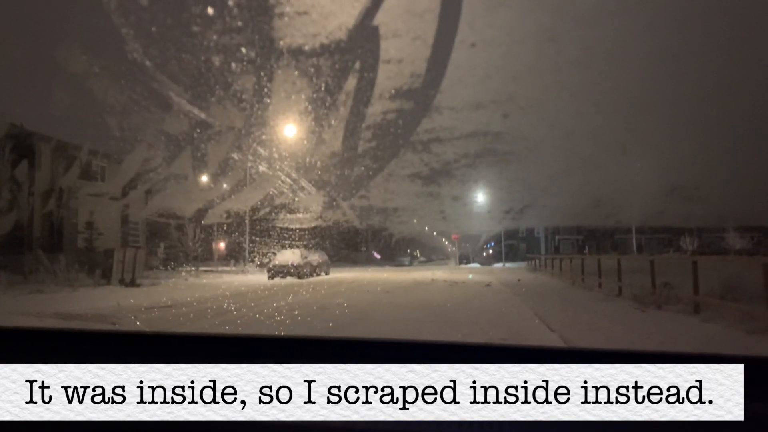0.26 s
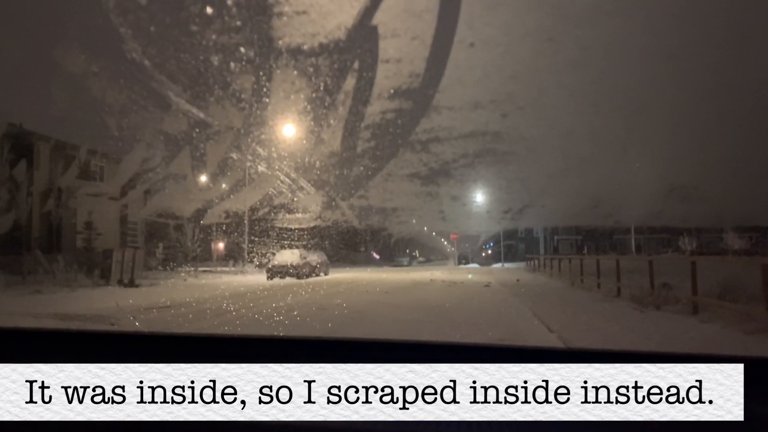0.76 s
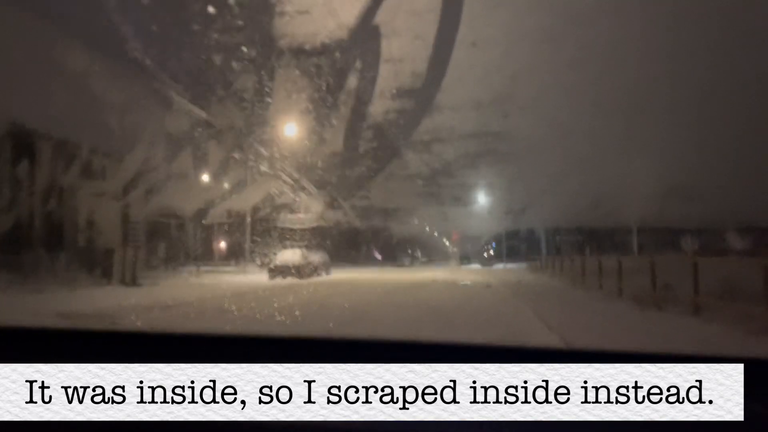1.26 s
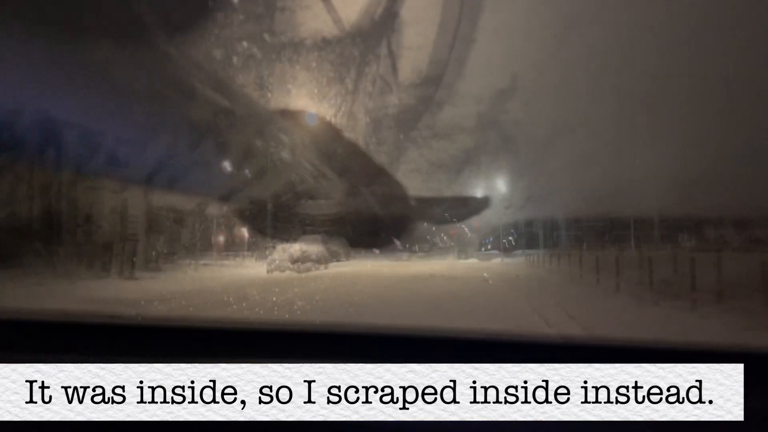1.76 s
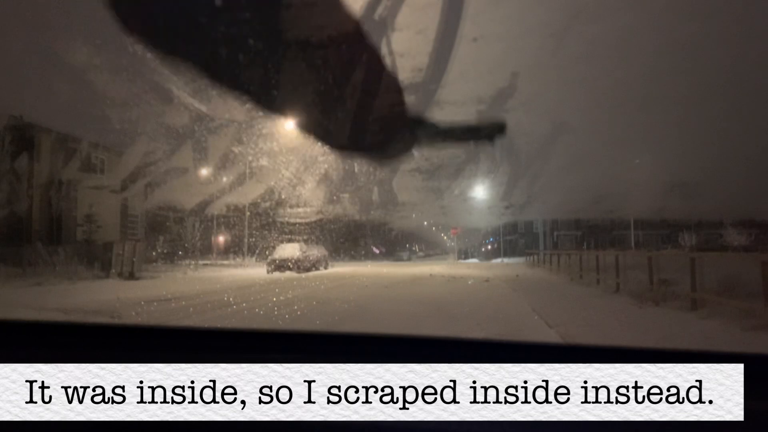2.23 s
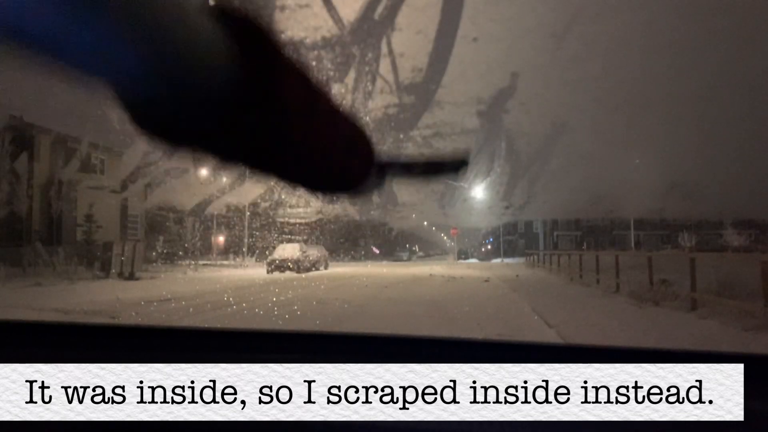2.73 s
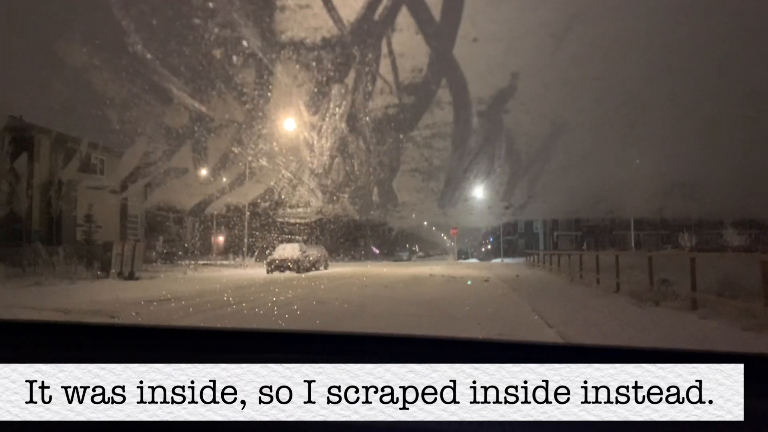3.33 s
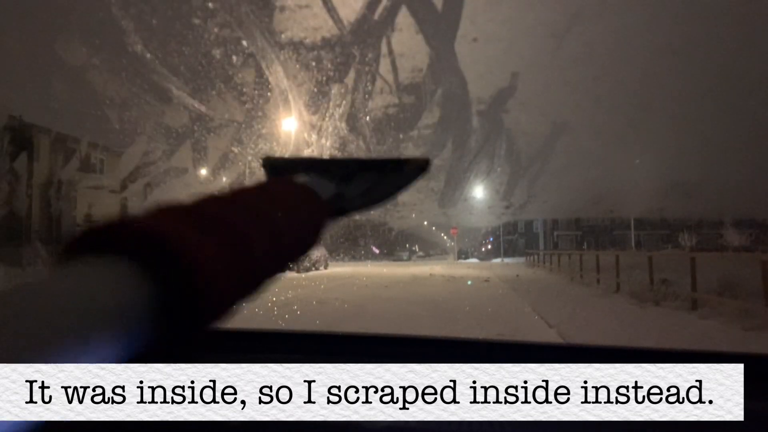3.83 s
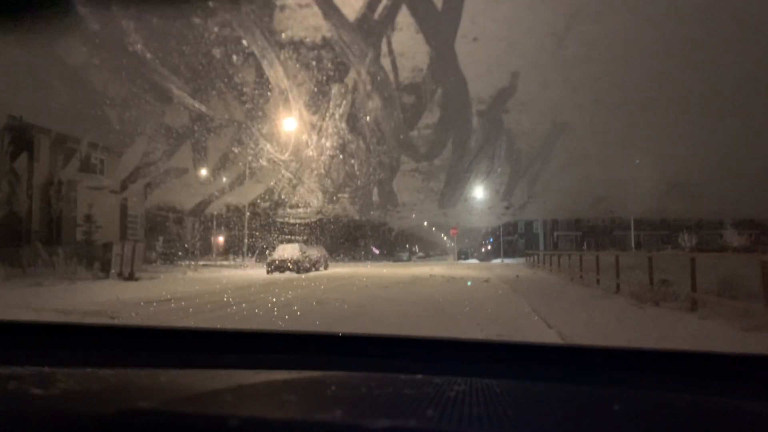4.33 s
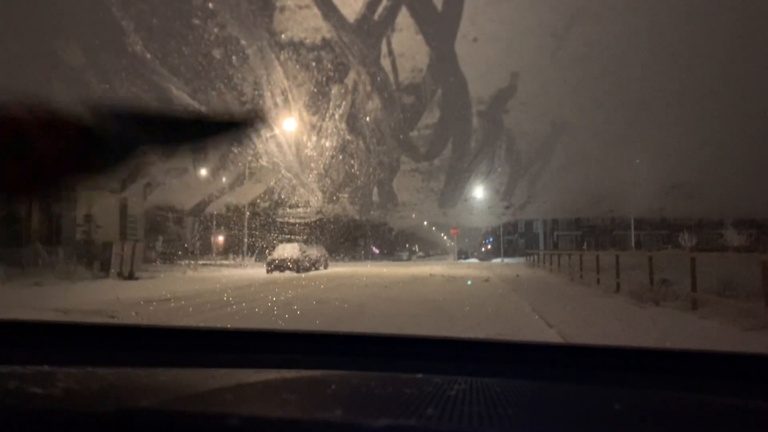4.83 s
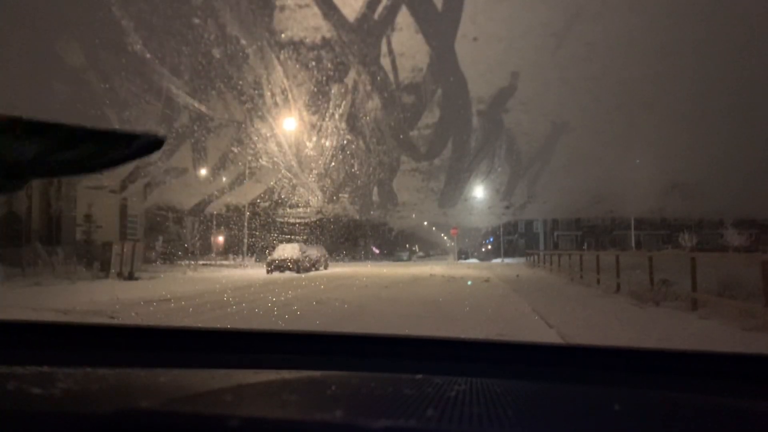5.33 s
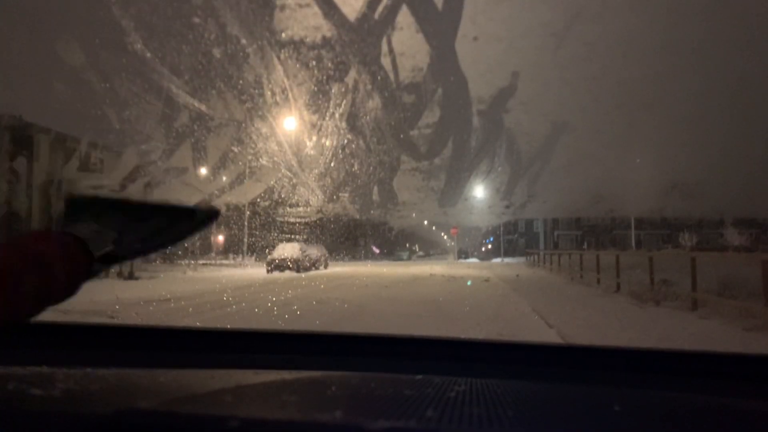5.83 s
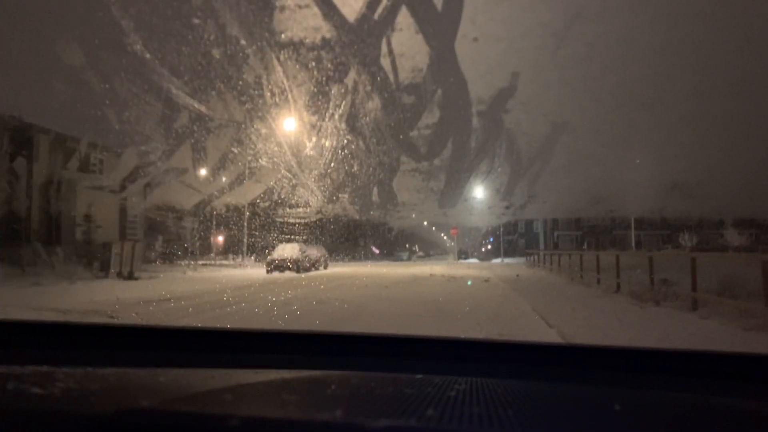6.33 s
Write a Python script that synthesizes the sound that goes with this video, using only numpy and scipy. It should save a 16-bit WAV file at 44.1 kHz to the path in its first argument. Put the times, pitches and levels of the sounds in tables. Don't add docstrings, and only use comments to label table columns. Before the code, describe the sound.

Low blower roar and a wavering engine hum fill a small, dry car cabin. A plastic blade clicks against the windscreen, then rasps frost in irregular strokes and flicks, each made of tiny bright ice cracks with a hollow plastic ring. The strongest scraping comes around the middle, then it turns patchier. One solid thud on the dash rattles loose trim before the final strokes. Heard close on a phone's two microphones.

```python
import sys
import numpy as np
from scipy import signal
from scipy.fft import rfft, irfft
from scipy.io import wavfile
from scipy.ndimage import uniform_filter1d

SR = 44100
rng = np.random.default_rng(int(sys.argv[2]) if len(sys.argv) > 2 else 0)


def transcribe(u):
    v = np.clip(np.atleast_2d(u).T, -1, 1)
    q = np.round(v * 32767).astype(np.int16)
    wavfile.write(sys.argv[1], SR, q)


def gain_from_db(level_db):
    decades = np.asarray(level_db, float) / 20
    return 10 ** decades


N = 289737

# (time [s], length [s], frost hiss [dB], swell along the stroke [dB],
# blade ring over hiss [dB])
STROKES = [(1.524, 0.18, -60, -12, 8), (1.962, 0.16, -58, 13.5, 4), (2.11, .082, -46, 1, 1),
           (2.391, 0.14, -49, 1.5, 2.5), (2.604, 0.085, -56, 11.5, 0), (2.734, 0.16, -42.5, 6.5, 1.5),
           (2.933, 0.079, -37.5, 2, 1), (3.061, 0.14, -31.5, -12.5, 1), (3.278, 0.064, -43, 3.5, 3),
           (3.421, 0.039, -37.5, -2, 4), (3.522, 0.11, -41.5, 4, 3), (3.652, 0.11, -40, -10, 3),
           (3.84, 0.035, -49.5, 9, 0.5), (3.953, 0.064, -40, 1, 4), (4.069, 0.094, -36, -0.5, 1),
           (4.28, 0.086, -44.5, -0.5, 1), (4.407, 0.07, -37, 0.5, 2.5), (4.526, 0.084, -38.5, -9, 1),
           (4.929, 0.0093, -39.5, -8, 1), (5.324, 0.12, -47, -4, 3.5), (5.645, 0.15, -59, 13, 0.5),
           (6.154, 0.066, -50, 6.5, 1), (6.5, 0.086, -45, -3.5, 1.5)]
# (peak time [s], frost hiss [dB], rise over 20 dB [ms], fall over 20 dB [ms],
# blade ring over hiss [dB])
FLICKS = [(1.162, -58, 38, 170, 7.5), (1.294, -63, 200, 72, 2), (1.792, -58, 97, 44, 10),
          (2.243, -49.5, 31, 35, 5), (2.7, -55, 40, 100, 1), (3.39, -41, 13, 11, 5.5),
          (4.2, -49, 40, 18, 6), (4.768, -44, 46, 22, 2.5), (4.805, -40.5, 20, 17, -4),
          (4.886, -39, 47, 24, 2.5), (4.951, -41, 10, 14, 4), (5.092, -48, 19, 74, 4.5),
          (5.161, -36, 28, 48, 3.5), (5.25, -34.5, 55, 76, 2.5), (5.562, -51.5, 137, 52, 3.5),
          (5.817, -37, 6.4, 17, -10), (5.879, -42, 120, 77, -1), (6.284, -38, 9, 56, -1),
          (6.406, -44, 12, 17, 3.5), (6.46, -40.5, 24, 10, 0)]
# (time [s], strongest ring [Hz])
GRIP = [(1.1, 2750), (2.1, 4040), (2.5, 3020), (2.85, 3330), (2.97, 3030), (3.08, 3480), (3.3, 3280),
        (3.43, 4080), (3.56, 3030), (3.66, 4350), (4.1, 3640), (4.45, 4340), (4.6, 2700), (4.88, 3400),
        (4.94, 4450), (5.16, 4230), (5.26, 2600), (6.57, 3300)]
# (pitch [Hz], width [Hz], level [dB])
BLADE = [(2000, 230, -5), (2385, 260, 1), (2700, 240, 2.5), (3030, 330, 0.5), (3450, 170, 1.5),
         (3670, 280, -1), (4080, 210, 1), (4350, 360, 1), (5100, 200, -1), (5960, 1300, -8),
         (6890, 2020, -8)]
# (pitch [Hz], width [Hz], level [dB])
FROST = [(8150, 600, -1), (9750, 800, 1), (10700, 900, -1), (12000, 1200, 0), (13100, 1300, -2.5),
         (14200, 1300, -4), (15300, 1400, -4)]
# (time [s], peak level [dB], pitch [Hz], broad crack against the ring [dB])
TICKS = [
    (1.097, -33.5, 8500, -2),
    (1.4255, -26, 14800, -11),
    (1.4405, -14.5, 4000, -6.5),
    (1.503, -24, 3300, -8),
    (1.5037, -11.5, 15700, -22),
    (2.237, -28, 2700, -12),
    (4.1906, -42, 6000, -4),
]
# (time [s], level [dB], softness [units of 0.088 ms])
KNOCKS = [
    (5.8236, -11.5, 0.11),
    (5.8254, -9.5, 0.58),
    (5.8279, -1, 0.28),
    (5.832, -26, .3),
    (5.836, -3, 2.8),
    (5.843, -13, 2.3),
]
# (pitch [Hz], level [dB], time to fade 60 dB [s])
DASH = [(96.7, -14, 0.27), (202.4, 1, 0.13), (420, -13.5, 0.035), (710, -0.5, 0.032), (1240, -8.5, 0.021),
        (1780, -3, 0.037), (2600, -18, 0.0027), (3250, -11.5, 0.017), (4840, -9, 0.0064),
        (6000, -15, 0.0025), (8300, -12, .004), (11300, -0.5, 0.0048)]
# (time [s], level [dB])
BLOWER = [
    (0, -31.5),
    (1.09, -31.5),
    (1.11, -28),
    (1.9, -28.5),
    (2.6, -29),
    (2.66, -31),
    (4.3, -31),
    (5.8, -31),
    (6.57, -31),
]
# (frequency [Hz], level per Hz [dB])
AIR = [(20, -36), (40, -10.5), (86, -1.5), (130, -6.5), (157, -11.5), (192, -4), (226, -8), (291, -7),
       (429, -13), (798, -15.5), (1100, -25), (1250, -19), (1600, -26), (1900, -32.5),
       (2600, -33), (3800, -37.5), (4400, -43), (6000, -46.5), (8000, -49), (10800, -55.5),
         (12000, -49.5), (15000, -56), (16000, -51)]
# (frequency [Hz], likeness [0-1, clipped])
LIKENESS = [(60, 0.7), (130, 0.98), (290, 0.8), (640, 0.57), (1410, 0.12), (3100, -0.67), (6820, -1.4),
            (15000, 7)]
# (peak time [s], level [dB], rise over 20 dB [ms], fall over 20 dB [ms])
BOOMS = [
    (.95, -34, 900, 250),
    (1.24, -31, 115, 1210),
    (2.1, -29, 150, 900),
    (2.49, -27, 130, 330),
    (3.16, -36, 160, 85),
    (4.45, -44, 190, 1500),
]
# (frequency [Hz], left minus right [dB])
TILT = [(60, -1.4), (110, -1.5), (200, 0.5), (380, 1.3), (700, 1.6), (1290, 0.3), (2380, 2), (4400, -2.2),
        (8120, 0), (15000, 0.8)]
# (frequency [Hz], half width [Hz], depth [dB])
DIPS = [(8675, 460, -7), (14300, 120, -5)]


def scraper():
    hiss_db, ring_db, top_hz = hand()
    happens, size, sign = rng.random((3, 2, N))
    size_db = np.minimum(-3.5 * np.log(size), 13)
    cracks = (happens < 7000 / SR) * gain_from_db(size_db) * np.sign(sign - 0.5)
    chatter = gain_from_db(0.7 * walk(110) + 0.2 * walk(28))
    one, other = (unit(cracks) + 0.5 * rng.standard_normal((2, N))) * chatter
    lag = np.round(8.9 * walk(5)).astype(int)
    moved = np.clip(np.arange(N) + lag, 0, N - 1)
    cracks = np.array([one, 0.33 * one[moved] + 0.82 * other])

    def blade_lift_db(hz):
        near_grip = 3.5 * np.exp(-((hz - top_hz) / 430) ** 2)
        return near_grip + np.where(hz < 5000, 3, 1.2) * walk(25)

    frost = voiced(cracks, FROST, lambda hz: 1.8 * walk(21), count=1)
    blade = voiced(cracks, BLADE, blade_lift_db, count=2)
    touching = np.arange(N) > 1.1 * SR
    return touching * gain_from_db(hiss_db) * (gain_from_db(5.5) * frost + gain_from_db(ring_db + 2.5) * blade)


def hand():
    bite_ms, lift_ms = 32, 37
    rest_db, rest_ring_db = -73.5, 11
    hiss_power = gain_from_db(2 * rest_db)
    ring_power = hiss_power * gain_from_db(2 * rest_ring_db)
    moves = [(s, length, db, by, bite_ms, lift_ms, over) for s, length, db, by, over in STROKES]
    moves += [(s, 0, db, 0, rise, fall, over) for s, db, rise, fall, over in FLICKS]
    for *shape, over_db in moves:
        power = gain_from_db(2 * swell(*shape))
        hiss_power = hiss_power + power
        ring_power = ring_power + power * gain_from_db(2 * over_db)
    return 10 * np.log10(hiss_power), 10 * np.log10(ring_power / hiss_power), curve(GRIP)


def swell(s, length, db, swell_db, rise_ms, fall_ms):
    since = np.arange(N) / SR - s
    length = max(length, 1e-4)
    hold = db + swell_db * np.clip(since / length, 0, 1)
    rise = 20 * np.minimum(since, 0) / (abs(rise_ms) * 1e-3)
    fall = 20 * np.maximum(since - length, 0) / (abs(fall_ms) * 1e-3)
    return hold + rise - fall


def voiced(cracks, modes, lift_db, count):
    gains = [gain_from_db(db + lift_db(hz)) for hz, width, db in modes]
    power = sum(gain ** 2 * width for gain, (hz, width, db) in zip(gains, modes))
    rings = 0
    for k, (hz, width, db) in enumerate(modes):
        note = cracks
        for _ in range(count):
            note = ring(note, hz, width)
        rings = rings + (-1) ** (k * count) * gains[k] * note
    return unit(rings / np.sqrt(power))


def ticks():
    out, t = np.zeros(N + 2048), np.arange(2048) / SR
    for (s, db, hz, crack_db), noise in zip(TICKS, rng.standard_normal((len(TICKS), 2048))):
        crack = noise * (np.exp(-t / 0.00051) + 0.3 * np.exp(-t / 0.0036))
        broad = ring(np.diff(crack, prepend=0), 5400, 11000)
        tick = gain_from_db(crack_db) * broad + ring(crack, hz, hz / 3)
        out[int(s * SR):][:2048] += gain_from_db(db) * tick / np.abs(tick).max()
    return out[:N]


def knock():
    push, t = np.zeros(N), np.arange(N) / SR
    for s, db, softness in KNOCKS:
        push -= gain_from_db(db) * np.exp(-((t - s) / (softness * 0.000088)) ** 2) / softness
    tail, body = t[:8192], 0
    for k, (hz, db, t60) in enumerate(DASH):
        fade = 1000.0 ** (-tail / t60)
        body = body + (-1) ** k * gain_from_db(db) * np.sin(2 * np.pi * hz * tail) * fade
    since = np.maximum(t - KNOCKS[0][0], 0)
    rattle = ring(rng.standard_normal(N), 1170, 1670) * np.sqrt(since / 0.015) * np.exp(-since / 0.0054)
    return gain_from_db(-28) * signal.fftconvolve(push, body)[:N] + gain_from_db(-3) * rattle


def blower():
    like = np.clip(across(LIKENESS), 0, 1)
    mid, side = rfft(rng.standard_normal((2, N)))
    ports = np.sqrt(1 + like) * mid + np.sqrt(1 - like) * side * np.array([[1], [-1]])
    ports = ports * gain_from_db(across(AIR))
    hz = np.fft.rfftfreq(N, 1 / SR)
    octave = np.log2(hz / 60 + 0.00059).clip(0).astype(int)
    roar = sum(gain_from_db(0.47 * walk(7.2)) * irfft(ports * (octave == k), N) for k in range(9))
    return unit(roar) * gain_from_db(curve(BLOWER) + 3.5)


def engine():
    idle_hz, hum_db, throb_db = 57.55, -44, 6
    boom_power = sum(gain_from_db(2 * swell(s, 0, db, 0, rise, fall)) for s, db, rise, fall in BOOMS)
    hum_power = gain_from_db(2 * (hum_db + throb_db * walk(4.25)))
    level = np.sqrt(boom_power + hum_power) * gain_from_db(0.64 * walk(9.1))
    pitch_hz = idle_hz * (1 + 0.027 * walk(4.4))
    return np.sqrt(2) * level * np.sin(2 * np.pi * np.cumsum(pitch_hz) / SR)


def cabin(x):
    t60_s, tail_db = 0.04, -7
    t = np.arange(4096) / SR
    tails = rng.standard_normal((2, 4096)) * 1000.0 ** (-t / t60_s) * (t > 0.001)
    tails *= gain_from_db(tail_db) / np.sqrt(np.sum(tails ** 2, axis=1, keepdims=True))
    return x + signal.fftconvolve(x[None], tails, axes=1)[:, :N]


def ring(x, hz, width):
    return signal.lfilter(*signal.iirpeak(min(hz, 20000), hz / width, SR), x)


def walk(rate):
    k = int(SR / rate)
    held = np.repeat(rng.standard_normal(N // k + 1), k)
    return 1.345 * uniform_filter1d(uniform_filter1d(held, k), k)[:N]


def unit(x):
    return x / np.sqrt(np.mean(x ** 2))


def curve(rows):
    s, value = np.transpose(rows)
    return np.interp(np.arange(N) / SR, s, value)


def across(points):
    hz, value = np.transpose(points)
    return np.interp(np.log(np.fft.rfftfreq(N, 1 / SR) + 1), np.log(hz), value)


def scene():
    left_db = 7.5
    dash = cabin(knock()) * gain_from_db(np.array([[0.5], [-0.5]]) * left_db)
    return scraper() + cabin(ticks()) + dash + blower() + engine()


def roll_off(x):
    return signal.sosfilt(signal.butter(12, 17060, fs=SR, output="sos"), x)


def record(dry):
    shared_hz, share_top = 6970, 1
    lag_s, in_step_hz = 0.000204, 11000
    left, right = rfft(dry)
    hz = np.fft.rfftfreq(N, 1 / SR)
    share = share_top / (1 + (shared_hz / (hz + 1)) ** 12)
    earlier = left * np.exp(2j * np.pi * (hz - in_step_hz) * lag_s)
    right = share * earlier + np.sqrt(1 - share ** 2) * right
    tilt = gain_from_db(across(TILT) / 2)
    dips = gain_from_db(sum(db * np.exp(-((hz - at) / width) ** 4) for at, width, db in DIPS))
    ports = np.array([left * tilt, right / tilt]) * dips
    ports = ports / (1 + (hz / 15880) ** 400)
    return roll_off(irfft(ports, N))


dry = scene()
out = record(dry)
transcribe(out)
```